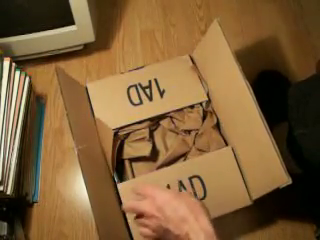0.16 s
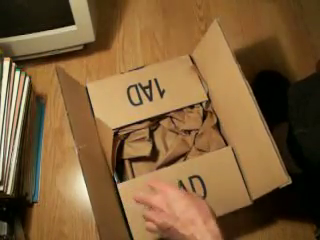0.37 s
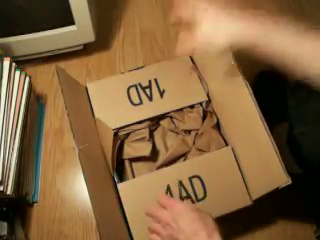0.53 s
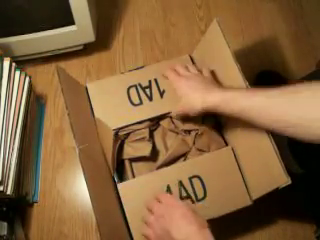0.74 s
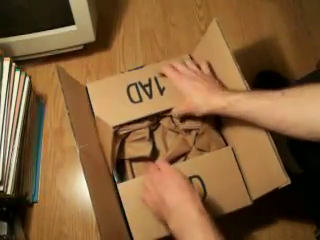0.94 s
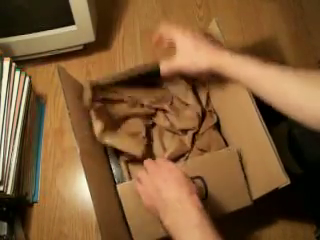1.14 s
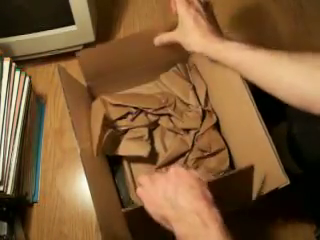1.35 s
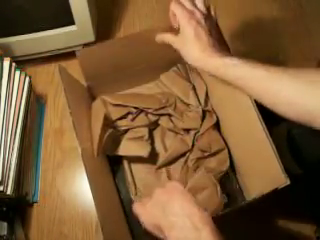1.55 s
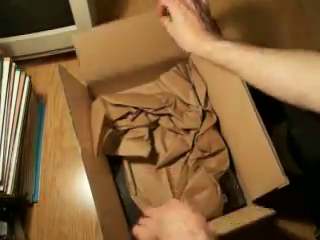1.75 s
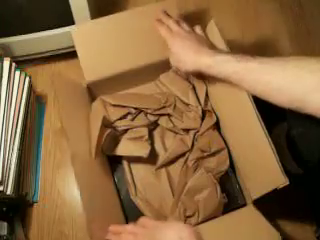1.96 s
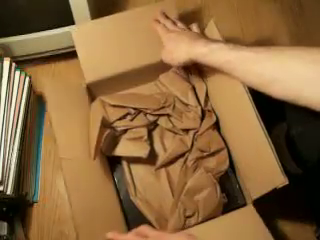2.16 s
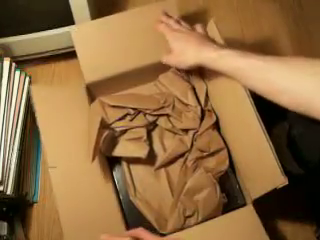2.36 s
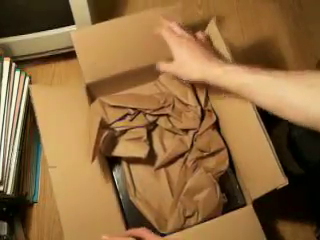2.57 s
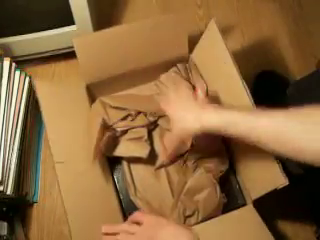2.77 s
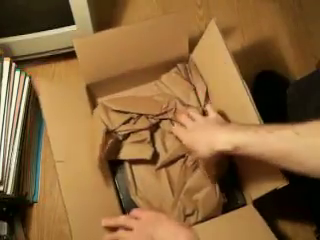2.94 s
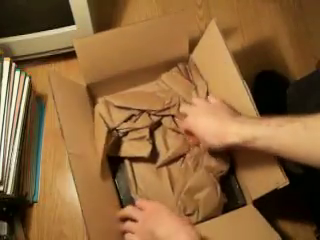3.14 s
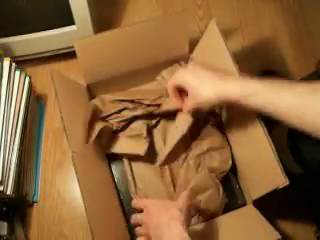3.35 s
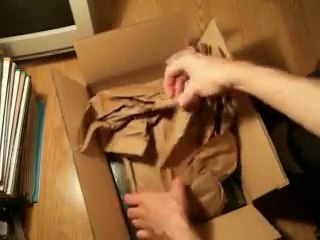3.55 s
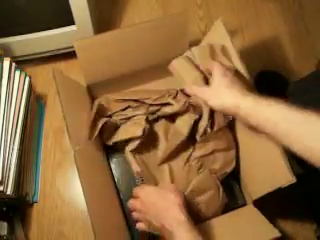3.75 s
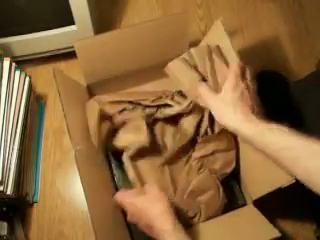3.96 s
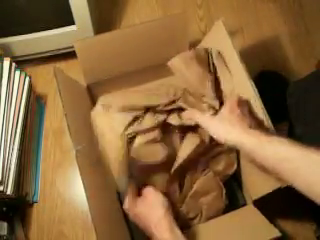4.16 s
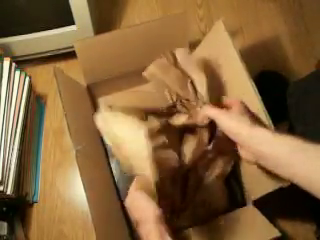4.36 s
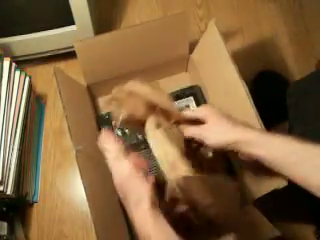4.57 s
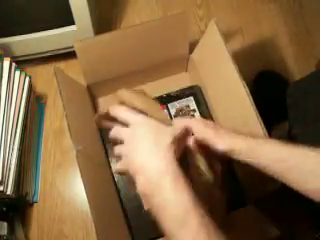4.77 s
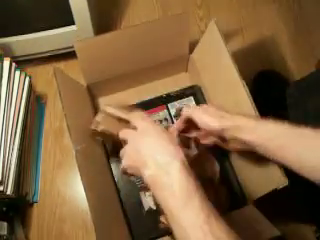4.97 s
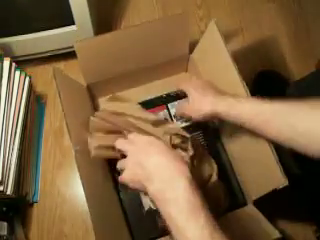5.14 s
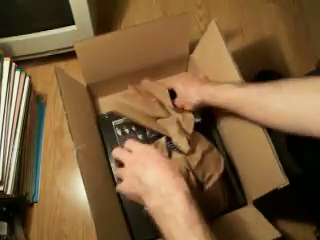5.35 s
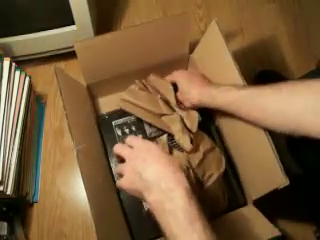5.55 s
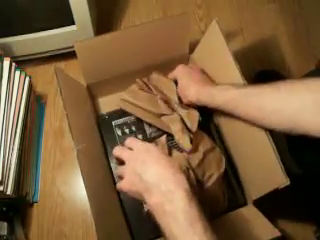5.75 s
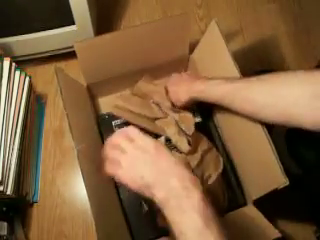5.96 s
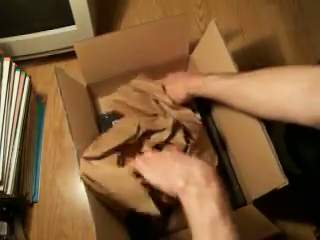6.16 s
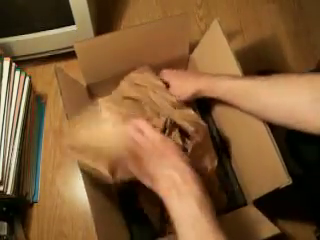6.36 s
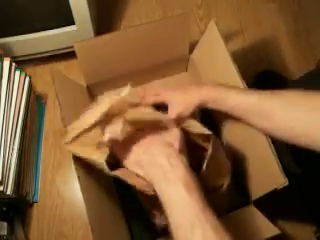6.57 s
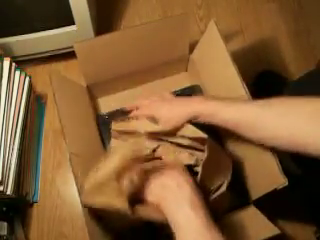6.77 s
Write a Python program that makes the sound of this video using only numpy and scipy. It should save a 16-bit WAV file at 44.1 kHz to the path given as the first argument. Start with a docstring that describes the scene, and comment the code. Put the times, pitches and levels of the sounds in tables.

```python
"""A quiet room with low rumble, hiss and mains hum; then hands fold open the flaps of a cardboard box,
and pull and crumple the stiff packing paper inside it. Creases snap (ringing noise puffs) over a dense
crackle (noise gated by random bursts); flaps knock and creak (blows and slips driving the wall modes).
A narrow-band microphone hears it and overloads on the hardest snaps."""
import sys
import numpy as np
from scipy import signal
from scipy.fft import rfft, irfft
from scipy.io import wavfile

SR = 44100
rng = np.random.default_rng(int(sys.argv[2]) if len(sys.argv) > 2 else 0)


def output_pcm(signal):
    """Save a mono or channel-first signal as 16-bit PCM at the path in sys.argv[1].

    Samples are clipped to [-1, 1] before scaling.
    """
    pcm = np.clip(np.atleast_2d(signal).T, -1, 1) * 32767
    wavfile.write(sys.argv[1], SR, np.round(pcm).astype(np.int16))


N = 300363
T = np.arange(N) / SR
PAPER_S = 2.72  # hands leave the smooth flaps for the creased paper


def gain_of(db):
    """Decibels to amplitude."""
    return 10 ** (np.asarray(db) / 20)


def evened(x):
    """Scales to rms 1."""
    return x / np.sqrt(np.mean(x ** 2) + 1e-20)


def coloured(x, points):
    """Filters by a spectrum table, interpolated over log frequency, and scales to rms 1."""
    point_hz, point_db = np.transpose(points)
    hz = np.fft.rfftfreq(len(x), 1 / SR)
    db = np.interp(np.log(hz + 1), np.log(point_hz + 1), point_db)
    return evened(irfft(rfft(x) * gain_of(db), len(x)))


def resonate(x, hz, width_hz):
    """A resonance of gain 1 at hz."""
    b, a = signal.iirpeak(hz, hz / width_hz, SR)
    return signal.lfilter(b, a, x)


def add(mix, start_s, sound):
    """Mixes a sound in at start_s, cut at the end of the mix."""
    part = mix[round(start_s * SR):][:len(sound)]
    part += sound[:len(part)]


def bursts(per_s, spread_db, decay_s):
    """Loudness of a rain of tiny bucklings: each starts at once and dies fast; a few are large."""
    starts = rng.random(N) < per_s / SR
    size = gain_of(spread_db * np.minimum(rng.exponential(1, N), 4)) * starts
    power = signal.lfilter([1], [1, -np.exp(-1 / (decay_s * SR))], size ** 2)
    return evened(np.sqrt(power + 1e-9))


ATTACK_DB_PER_S, RELEASE_DB_PER_S = 2504, 705.5


def powers(rows):
    """Power of each stroke: quick onset, a straight dB run from first to last level, then a fade."""
    out = []
    for start_s, length_s, first_db, last_db, *_ in rows:
        since_s = T - start_s
        run_db = first_db + (last_db - first_db) * np.clip(since_s / length_s, 0, 1)
        onset_db = ATTACK_DB_PER_S * np.minimum(since_s, 0)
        fade_db = RELEASE_DB_PER_S * np.maximum(since_s - length_s, 0)
        out.append(gain_of(2 * np.maximum(run_db + onset_db - fade_db, -150)))
    return np.array(out)


# Room hiss spectrum. Each row: frequency in Hz, relative density in dB per Hz.
HISS_SPECTRUM = [(60, 3), (200, 0.5), (600, -2), (1200, -6), (3000, -9.5), (4400, -8.5), (5200, -12.5),
                 (6000, -31)]
HISS_RMS_DB = -39
# Rumble level over time. Each row: time in seconds, level in dB.
RUMBLE_LEVEL = [(0.0, -34), (0.44, -45.5), (2.24, -41.5), (2.43, -40), (2.54, -46.5), (4.93, -47),
                (5.1, -40), (5.95, -41.5), (6.64, -51), (6.81, -41)]
# Mains hum partials. Each row: frequency in Hz, rms level in dB.
HUM_PARTIALS = [(120, -58), (241, -53.5)]


def background():
    """Room hiss and a low wavering rumble, both shaped noise, plus steady sines of mains hum."""
    hiss = gain_of(HISS_RMS_DB) * coloured(rng.standard_normal(N), HISS_SPECTRUM)
    rumble_spectrum = [(5, -3.0), (15, -15.5), (40, 0.0), (70, -19), (150, -50.5)]  # Hz, dB per Hz
    rumble = coloured(rng.standard_normal(N), rumble_spectrum)
    time_s, level_db = np.transpose(RUMBLE_LEVEL)
    rumble = gain_of(np.interp(T, time_s, level_db)) * rumble
    hum = sum(gain_of(db) * np.sqrt(2) * np.sin(2 * np.pi * hz * T) for hz, db in HUM_PARTIALS)
    return hiss + rumble + hum


def room(x):
    """A short diffuse tail from box and floor; three noise tails trade places steadily at 1.5 Hz."""
    t, out = np.arange(6000) / SR, np.zeros(N)
    for k in range(3):
        tail = rng.standard_normal(len(t)) * gain_of(-60 * t / 0.32) * (t > .0025)
        turn = np.sqrt(2 / 3) * np.cos(np.pi * (3.0 * T + k / 3))
        out += signal.oaconvolve(x * turn, tail / np.linalg.norm(tail))[:N]
    return gain_of(-14) * out


# Cardboard wall modes. Each row: frequency in Hz, width in Hz, relative level in dB.
WALL_MODES = [(136, 29, -13), (260, 130, -15.5), (526, 69, 0), (663, 87, -2), (1374, 91, -6),
              (1900, 430, -16), (2660, 1200, -18), (4340, 360, -12)]


def walls(x):
    """The cardboard walls ring at their modes."""
    return sum(gain_of(db) * resonate(x, hz, width_hz) for hz, width_hz, db in WALL_MODES)


# A flap folds slowly. Each row: start in seconds, length in seconds, level at start in dB, level at end in dB.
FLAP_FOLDS = [(1.9, 0.39, -40, -35.5), (2.325, 0.16, -35, -31.5), (2.53, 0.17, -39, -35)]


def creak():
    """The fold line slips unevenly, driving the walls."""
    slips = rng.standard_normal(N) * bursts(210, 2.9, 0.0073)
    ring = evened(walls(resonate(slips, 1800, 5000)))
    return np.sqrt(powers(FLAP_FOLDS).sum(0)) * ring


# Flaps and hands bump the cardboard. Each row: start in seconds, dry peak in dB, push rate in Hz (low is dull).
BUMPS = [(1.199, -14, 522), (1.43, -13.5, 503), (1.438, -7, 528), (1.446, -14, 517), (1.618, -13, 743),
         (1.436, -26, 130), (1.747, -20, 124), (1.882, -11, 160), (4.291, -17.5, 113), (5.02, -19, 292)]


def knocks():
    """Soft blows, longer for duller ones, with a harder edge and a scuff, ring the walls."""
    out, t = np.zeros(N), np.arange(4000) / SR
    scuffs = rng.standard_normal((len(BUMPS), len(t))) * gain_of(-60 * t / .06)
    for (start_s, peak_db, hz), scuff in zip(BUMPS, scuffs):
        push = -np.sin(2 * np.pi * hz * t) * np.sin(np.pi * hz * t) * (t < 1 / hz)
        edge = 62.0 / hz * np.exp(-((t - .002) / 0.00039) ** 2)
        blow = push + edge
        ring = 0.1 * blow + walls(blow + 0.3 * scuff)
        add(out, start_s, gain_of(peak_db) * ring / abs(ring).max())
    return out


STRAY_DB, STRAY_SPREAD_DB = 4, 12  # least peak over the stroke level, and the random range above it


def strays(power, count):
    """Chance snaps in the paper, as rows for snaps(); their peaks follow the pull at that moment."""
    when, size, pitch = rng.random((count, 3)).T
    start_s = PAPER_S + when * (T[-1] - PAPER_S)
    pull_db = 10 * np.log10(np.interp(start_s, T, power.sum(0)))
    peak_db = pull_db + STRAY_DB + STRAY_SPREAD_DB * size
    return list(zip(start_s, peak_db, 2600 * 2 ** (0.95 * pitch)))


# The clearest creases that buckle. Each row: start in seconds, dry peak in dB, patch pitch in Hz.
CREASES = [(0.623, -16.5, 3720), (0.704, -22, 1320), (0.751, -1, 1650), (1.011, -11.5, 2980),
           (1.048, -12, 1520), (1.19, -6, 1980), (1.334, -1.5, 1640), (1.606, -15, 1460), (2.722, -3, 1860),
           (2.74, -8, 5000), (2.864, -7.5, 4340), (2.893, -1, 4500), (2.916, -1, 4900), (3.014, -9, 1930),
           (3.044, -2, 4600), (3.065, 0, 2270), (3.104, -11, 4600), (3.157, -9, 4720), (3.17, 1, 2060),
           (3.238, -7.5, 2780), (3.284, -10, 2030), (3.332, -7, 4600), (3.366, -14, 4600),
           (3.444, -3, 4360), (3.52, -20, 3600), (3.661, -4, 4200), (3.716, 1, 3770), (3.766, 0.5, 4070),
           (3.809, -7, 4400), (3.85, -8, 2170), (3.884, 4.5, 4440), (3.928, -2, 4730), (3.985, 3, 4420),
           (4.031, -5, 3480), (4.044, -4, 3300), (4.079, -3, 3890), (4.091, -1, 4650), (4.125, -4, 1670),
           (4.187, -5, 4180), (4.215, -20, 5120), (4.278, -15, 2000), (4.332, 2.5, 4710), (4.399, -4, 3510),
           (4.493, -5, 4620), (4.528, -1.5, 3350), (4.563, 0.5, 3360), (4.607, -11, 3800),
           (4.697, -9, 1980), (4.84, 3, 2430), (4.996, -3, 4780), (5.017, -0.5, 4900), (5.04, -14, 2480),
           (5.081, -6, 5170), (5.177, -4, 4320), (5.272, -3, 4410), (5.326, -4, 1740), (5.368, -8, 4120),
           (5.478, -12, 4890), (5.497, -19, 1490), (5.537, -19, 2020), (5.932, -5.5, 3990),
           (5.959, -16, 3600), (6.038, 0, 4060), (6.092, -4, 3820), (6.296, -9, 3580), (6.361, 0, 3980),
           (6.425, 6.5, 3230), (6.5, -15, 4600), (6.562, -4, 3770), (6.623, -10, 3660), (6.671, -1, 4310),
           (6.775, -2, 4480)]


def snaps(rows):
    """A crease flips: a tick and a short puff ringing at the pitch of its patch; low patches ring longer."""
    out, t = np.zeros(N), np.arange(1500) / SR
    tick = 1.5 * (t == t[50])  # one sample, near the start
    for (start_s, peak_db, hz), puff in zip(rows, rng.standard_normal((len(rows), len(t)))):
        swell = (1 - np.exp(-t / 0.0014)) * gain_of(-60 * t / (0.005 + 18 / hz))
        drive = puff * swell + tick
        tone = resonate(drive, hz, .2 * hz) + 0.36 * resonate(drive, 3600, 4000)
        add(out, start_s, gain_of(peak_db) * tone / abs(tone).max())
    return out


# Rubs and pulls of the hands. Each row: start in seconds, length in seconds, level at start in dB,
# level at end in dB, brightening in dB per octave, share of dull flexing in dB.
HAND_STROKES = [(0.626, 0.027, -35.5, -43, 5.5, -19), (0.708, .17, -32.5, -35.5, -3.5, -3),
                (0.882, 0.1, -28, -34.5, 2.5, -6), (1.006, .055, -28.5, -30, -1.5, -3.5),
                (1.08, 0.075, -27, -17, 0, -8.5), (1.186, 0.052, -22, -26.5, -0.5, -7.5),
                (1.414, 0.37, -41.5, -39, -1.5, -2), (1.603, 0.02, -32, -37.5, -6.5, -4),
                (1.84, 0.06, -42, -40, -0.5, -1), (2.73, 0.023, -18.5, -11, 3.5, -10.5),
                (2.776, 0.061, -26, -25.5, -1, -13), (2.857, .062, -19.5, -15.5, 2, -12),
                (2.92, 0.311, -27.5, -14, -0.5, -7.5), (3.255, 0.236, -20.5, -20, 0.5, -10.5),
                (3.509, 0.13, -18, -17.5, -0.5, -7.5), (3.656, 0.12, -14.5, -23.5, 2, -10),
                (3.776, 0.045, -27.5, -29, 1, -8), (3.842, 0.11, -17, -17.5, 0.5, -11),
                (3.975, 0.53, -16.5, -17, 3, -8.5), (4.526, 0.015, -21, -21, -1, -8),
                (4.562, 0.024, -17, -17, 1.5, -12), (4.605, 0.071, -17.5, -17, 1.5, -7.5),
                (4.694, .285, -18, -16, 0.5, -9), (4.994, 0.066, -20, -19, 0, -8.5),
                (5.074, 0.13, -22, -21, 1.5, -11), (5.205, 0.078, -23.5, -18.5, 1, -4.5),
                (5.318, 0.11, -32, -36.5, 0.5, -3.5), (5.473, 0.026, -25.5, -29.5, 1, -7),
                (5.764, 0.19, -40, -29.5, 0.5, -4), (5.959, 0.16, -18, -15.5, 2.5, -5),
                (6.138, 0.07, -24, -29.5, 1.5, -2), (6.234, 0.047, -30.5, -16, 0.5, -8),
                (6.293, .52, -15.5, -17, 2, -8.5)]
# Crackle colour. Each row: frequency in Hz, relative density in dB per Hz.
CRISP_SPECTRUM = [(530, -19), (900, -3.5), (979, -6.5), (1980, 0), (2400, -1.5), (4630, 2), (5190, -0.5),
                  (5600, -9), (7280, -40), (12300, -120)]
# Large paper panels flexing. Each row: frequency in Hz, relative density in dB per Hz.
DULL_SPECTRUM = [(59, -45), (100, -10), (179, -12.5), (319, -1), (454, -2.5), (500, 2.5), (620, 4.5),
                 (1300, -2.5), (1690, -7.5), (2860, -120)]


def crackle(power):
    """Tiny creases, each patch of paper with its own pitch; some flip the whole sheet; big panels flex duller."""
    total = power.sum(0)
    # power-weighted mean, so the loudest stroke sets the colour
    bright_db_per_oct, dull_db = np.array(HAND_STROKES)[:, 4:].T @ power / total
    grain = np.where(T < PAPER_S, .6, 1)  # cardboard rubs smoother than paper
    rustle, sharp_ticks = 0.44 * bursts(300, 0.75, 0.018), 0.21 * bursts(150, 4.06, 0.00094)
    sheet = np.hypot(rustle, sharp_ticks) ** grain
    patches = np.zeros(N)
    for hz in np.geomspace(1000, 5500, num=6):
        patch = resonate(rng.standard_normal(N), hz, .5 * hz) / np.sqrt(hz)
        tilt = gain_of(bright_db_per_oct * np.log2(hz / 3500))
        patches += patch * bursts(400, 2.5, 0.0015) ** grain * tilt
    flat = coloured(patches, [(1000, -4.0), (5500, -1.0)])
    crisp = coloured(flat * sheet, CRISP_SPECTRUM)
    dull = coloured(rng.standard_normal(N) * bursts(300, 0.64, 0.0056) * sheet, DULL_SPECTRUM)
    return np.sqrt(total) * (crisp + gain_of(dull_db) * dull)


def scene():
    """Everything handled sounds in the room, over the background."""
    power = powers(HAND_STROKES)
    all_snaps = snaps(list(CREASES) + strays(power, count=150))
    near = creak() + knocks() + all_snaps + crackle(power)
    return (background() + room(near) + near)[None]


BAND_HZ, EDGE_HZ = 5850, 15800


def lowpass(x, taps, cutoff_hz):
    """Linear-phase low-pass without delay."""
    kernel = signal.firwin(taps, cutoff_hz, window=("kaiser", 9), fs=SR)
    return signal.oaconvolve(x, kernel[None], "same")


def record(dry):
    """The preamplifier squeezes peaks; narrow microphone band, a small offset, a hard ceiling, the band limit."""
    squeezed = .8 * np.tanh(dry / .8)
    narrow = lowpass(squeezed, 181, BAND_HZ)
    held = np.clip(narrow - .0045, -.71, .71)
    return lowpass(held, 511, EDGE_HZ)


dry = scene()
out = record(dry)
output_pcm(out)
```